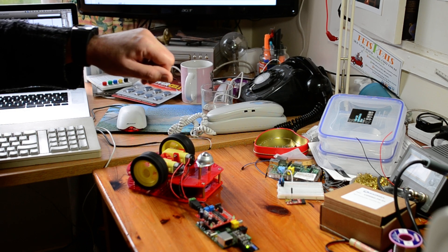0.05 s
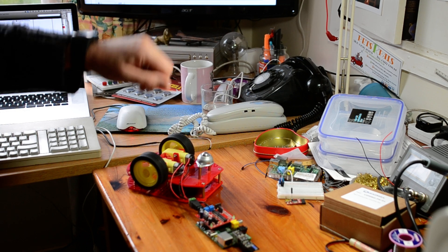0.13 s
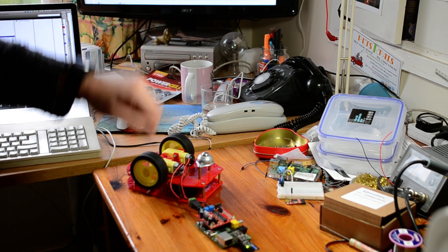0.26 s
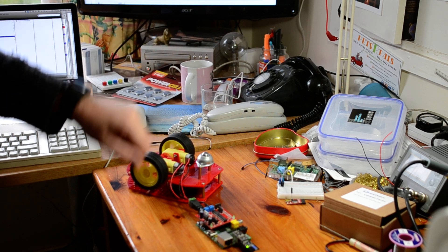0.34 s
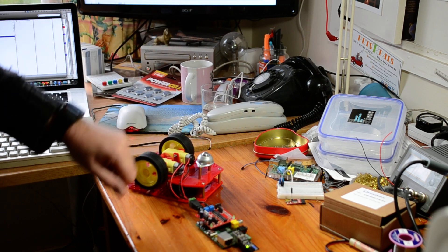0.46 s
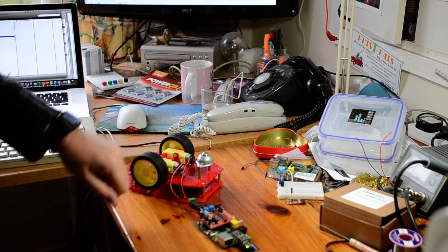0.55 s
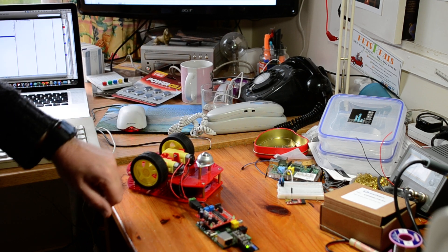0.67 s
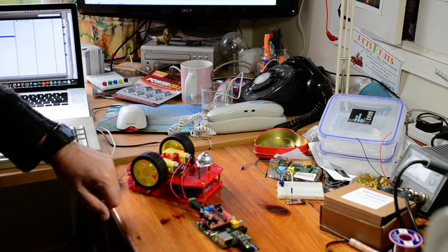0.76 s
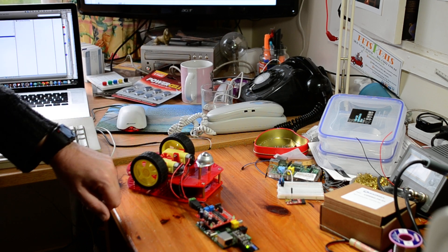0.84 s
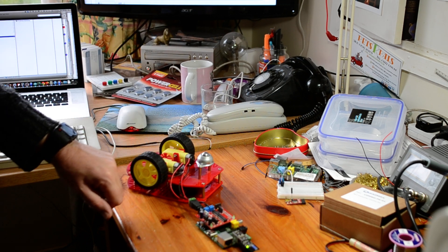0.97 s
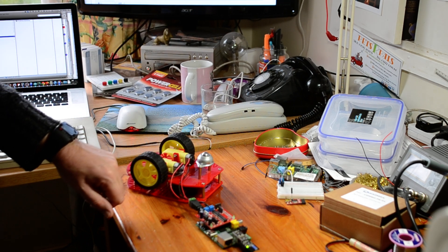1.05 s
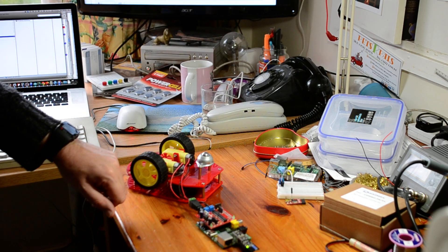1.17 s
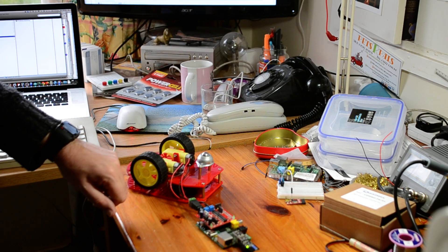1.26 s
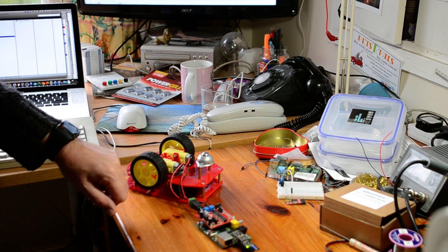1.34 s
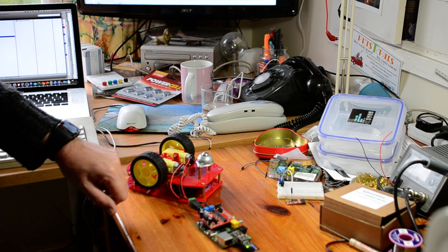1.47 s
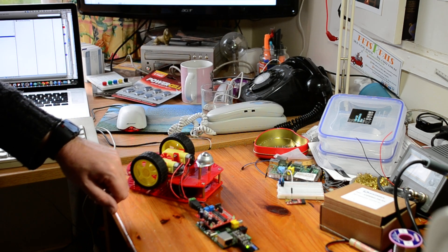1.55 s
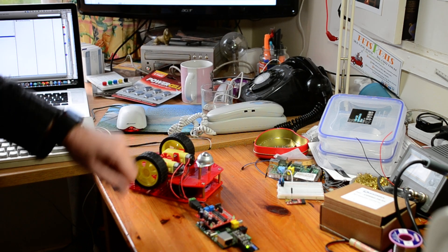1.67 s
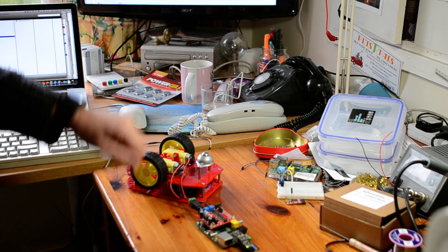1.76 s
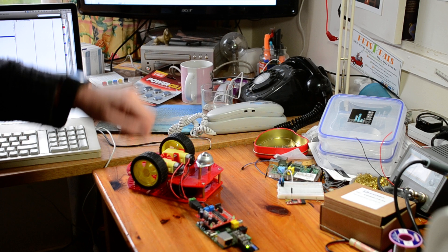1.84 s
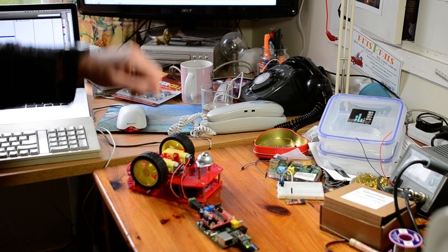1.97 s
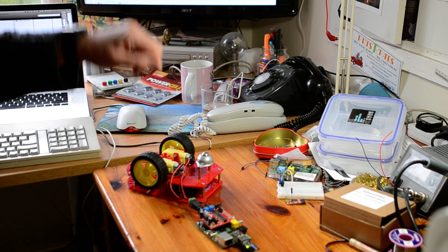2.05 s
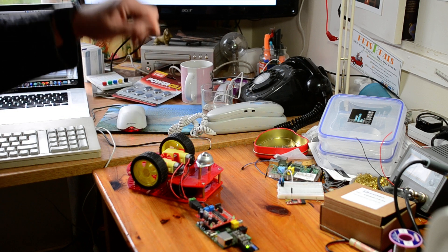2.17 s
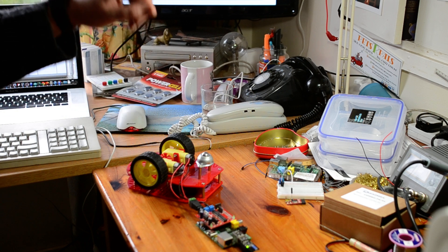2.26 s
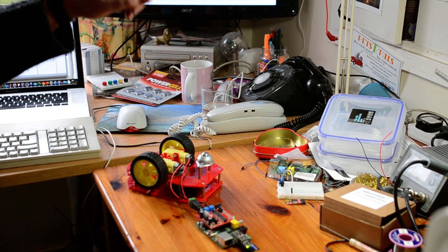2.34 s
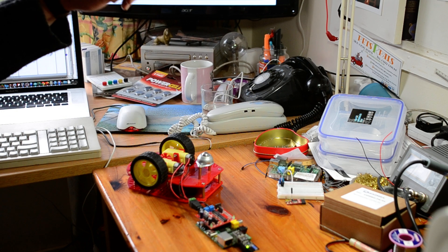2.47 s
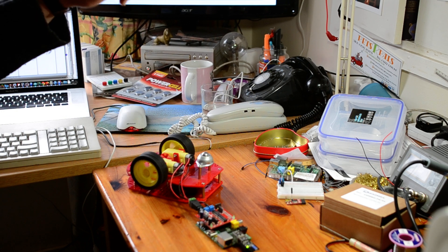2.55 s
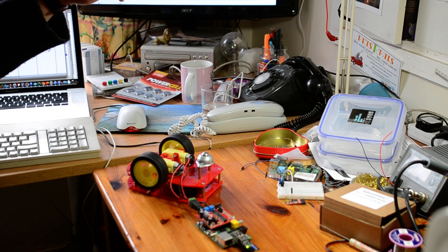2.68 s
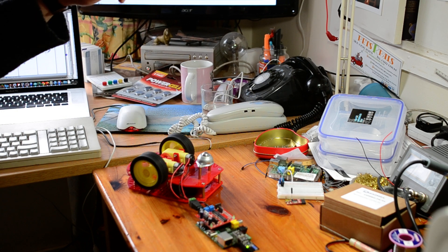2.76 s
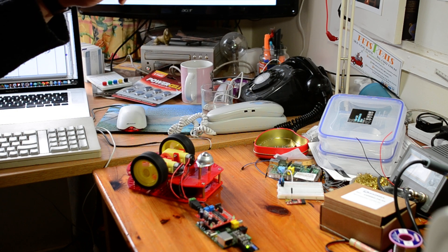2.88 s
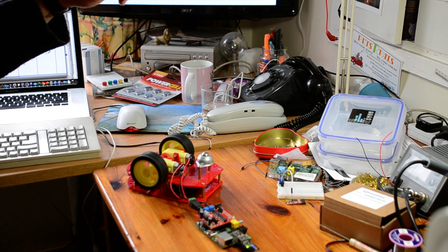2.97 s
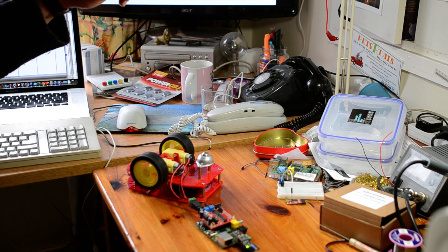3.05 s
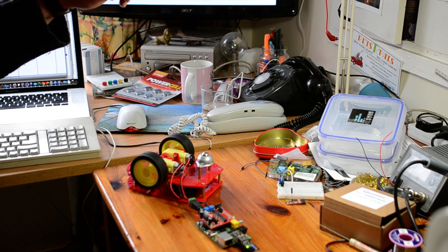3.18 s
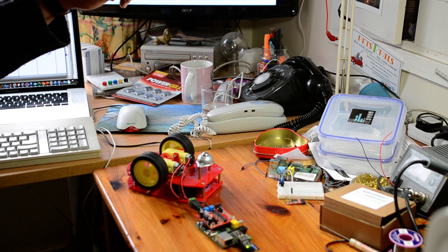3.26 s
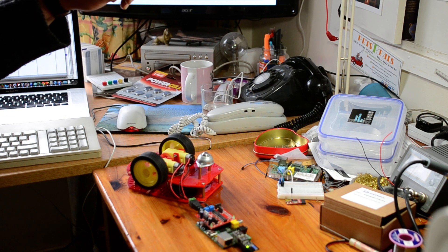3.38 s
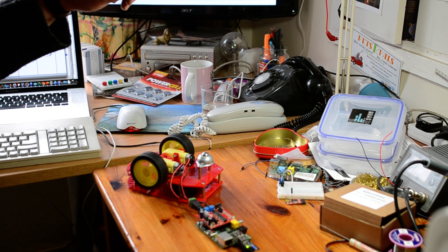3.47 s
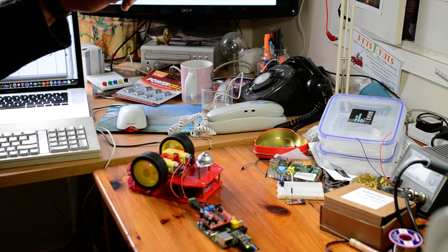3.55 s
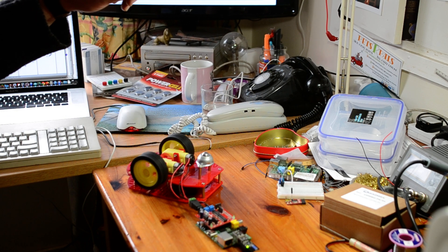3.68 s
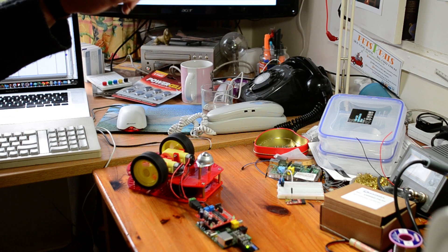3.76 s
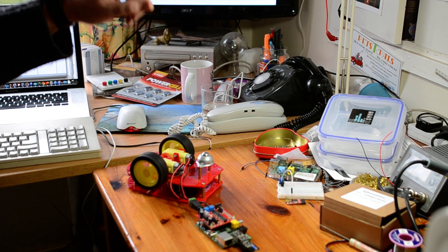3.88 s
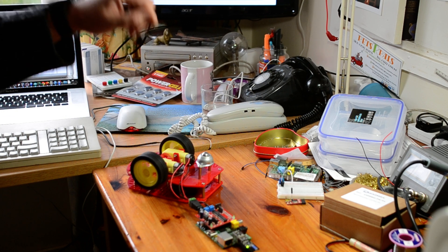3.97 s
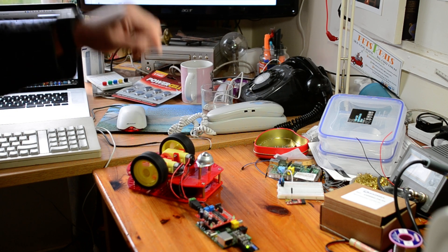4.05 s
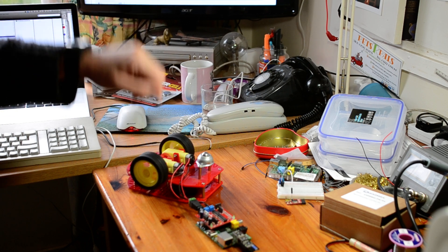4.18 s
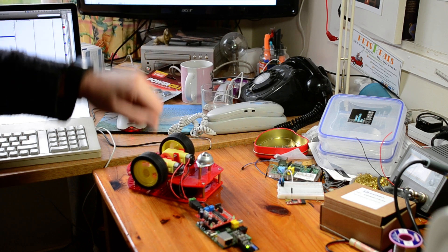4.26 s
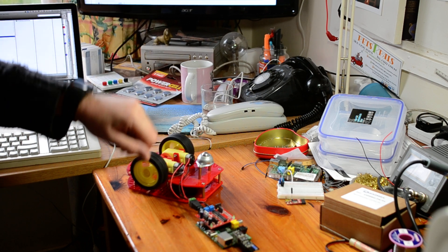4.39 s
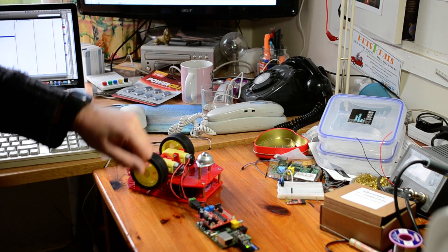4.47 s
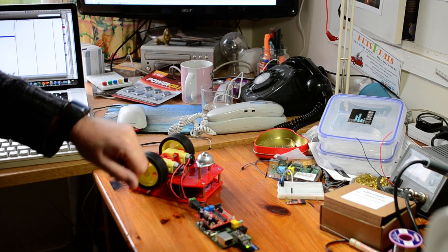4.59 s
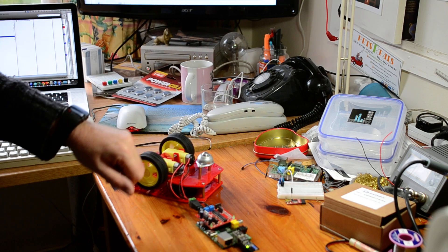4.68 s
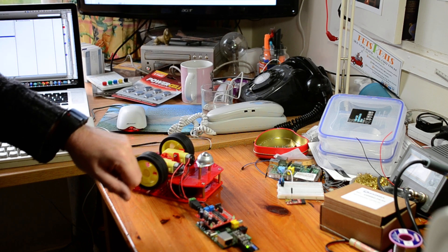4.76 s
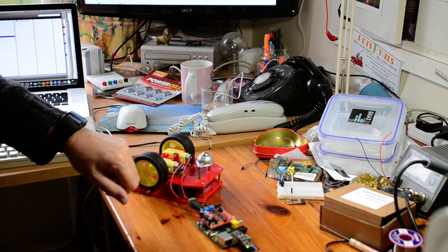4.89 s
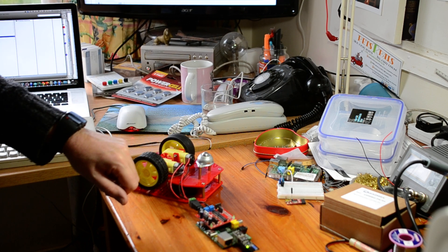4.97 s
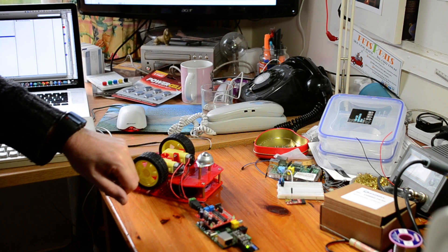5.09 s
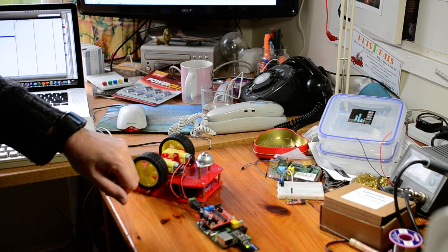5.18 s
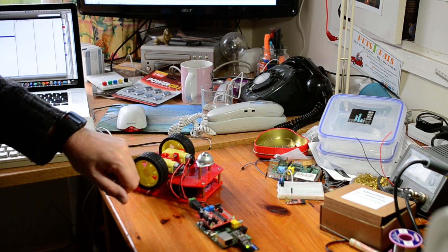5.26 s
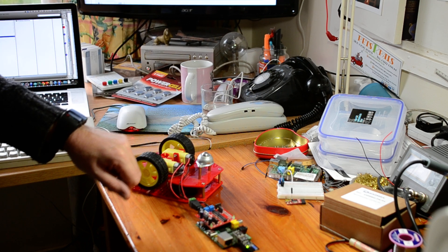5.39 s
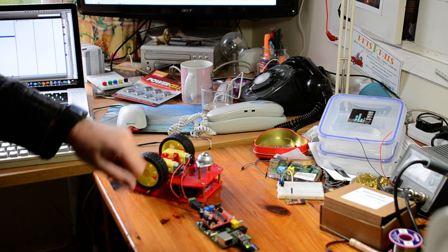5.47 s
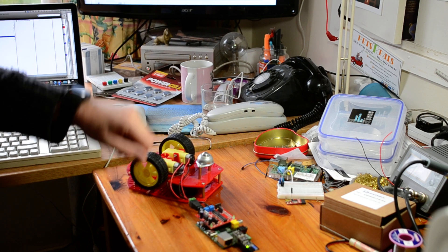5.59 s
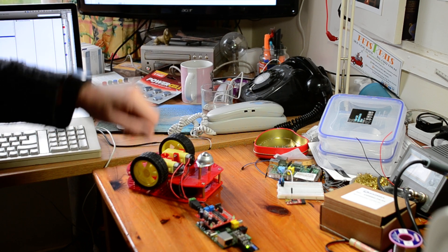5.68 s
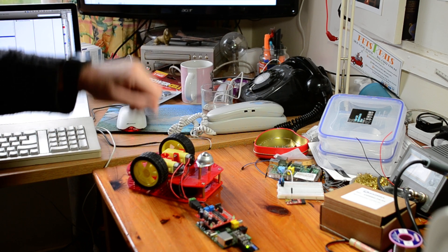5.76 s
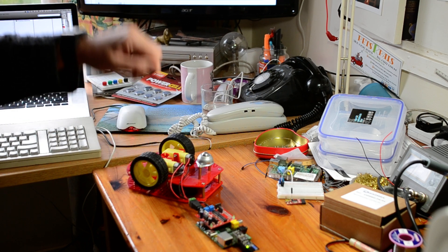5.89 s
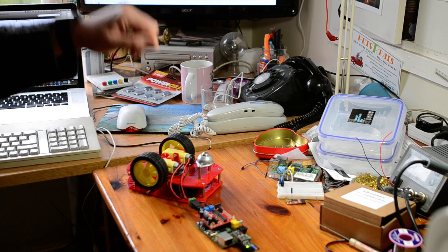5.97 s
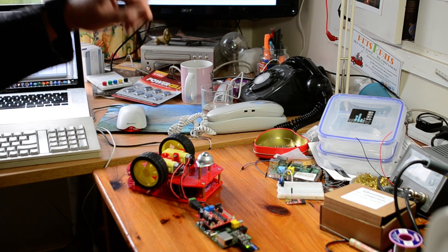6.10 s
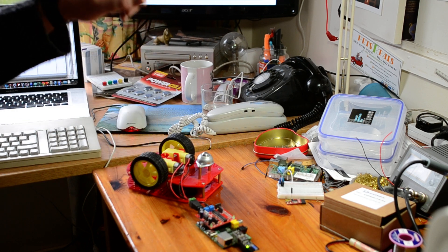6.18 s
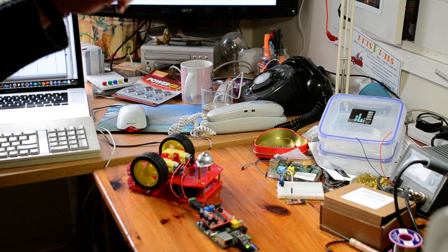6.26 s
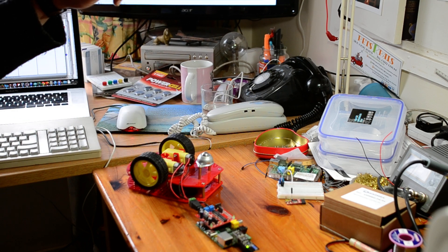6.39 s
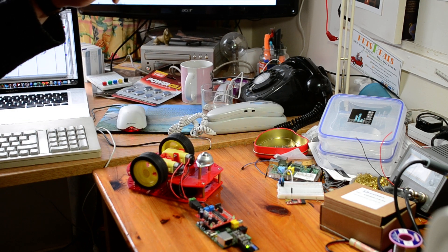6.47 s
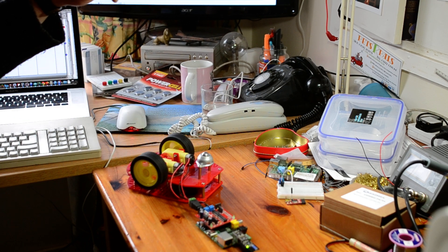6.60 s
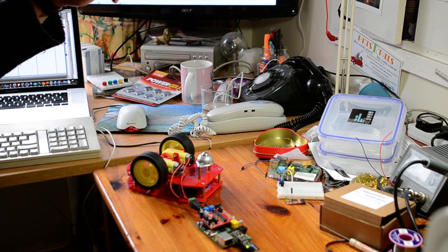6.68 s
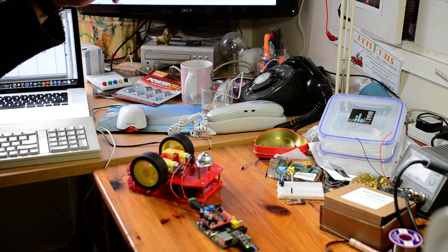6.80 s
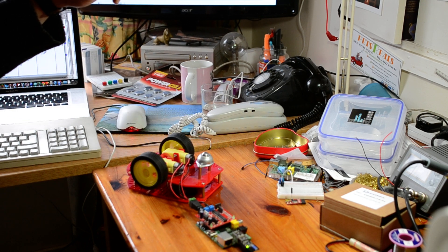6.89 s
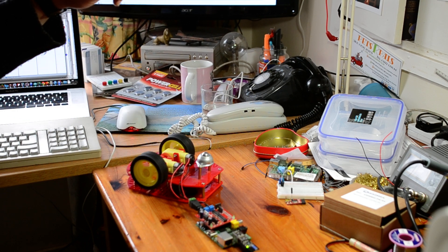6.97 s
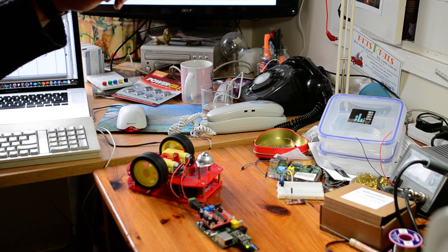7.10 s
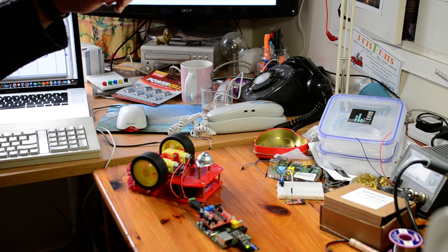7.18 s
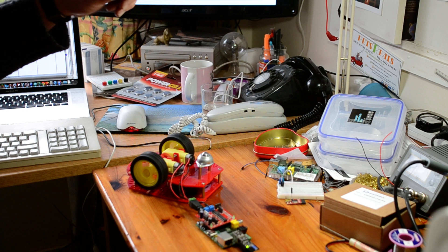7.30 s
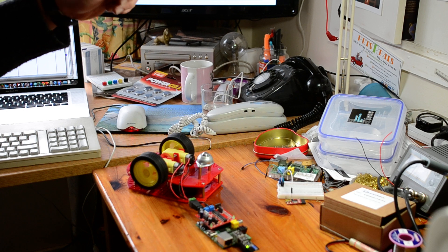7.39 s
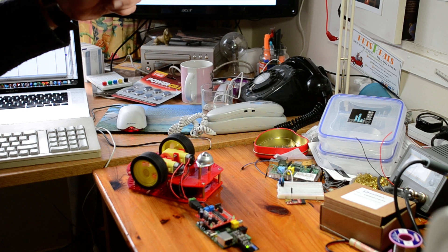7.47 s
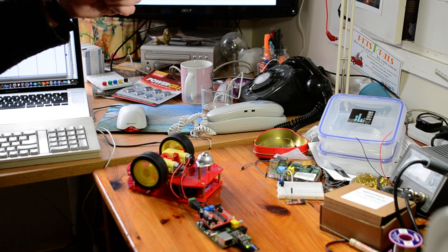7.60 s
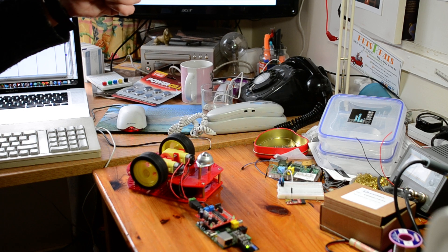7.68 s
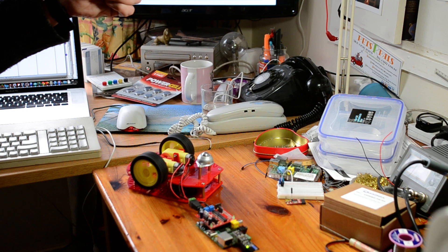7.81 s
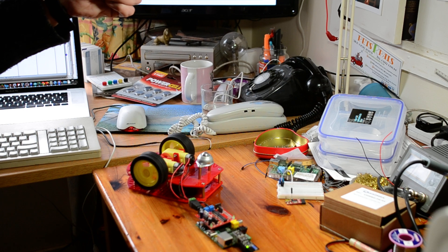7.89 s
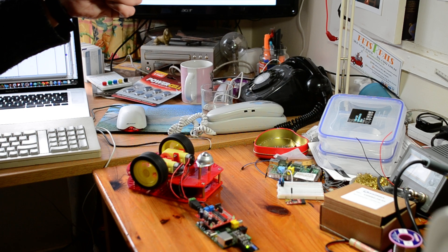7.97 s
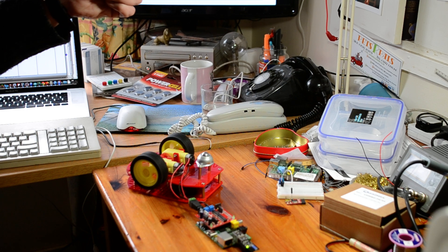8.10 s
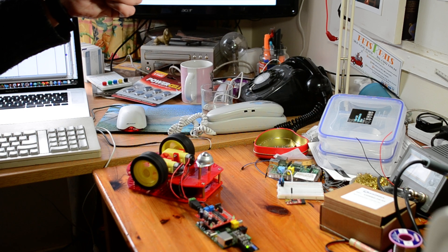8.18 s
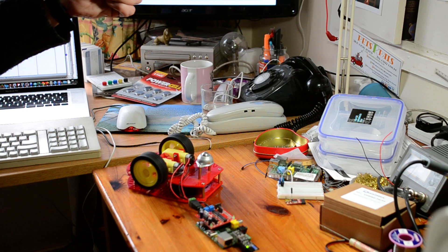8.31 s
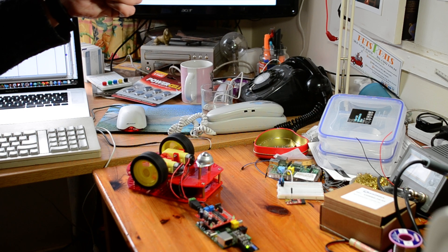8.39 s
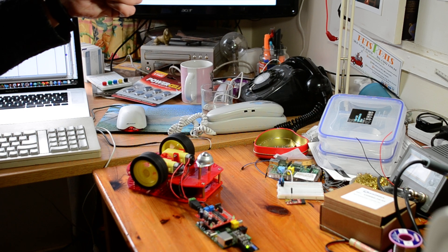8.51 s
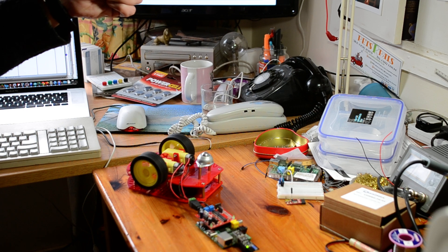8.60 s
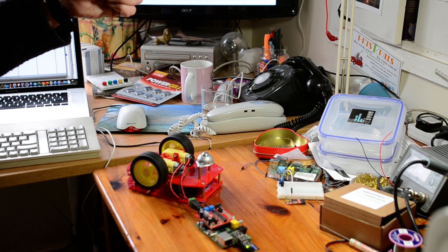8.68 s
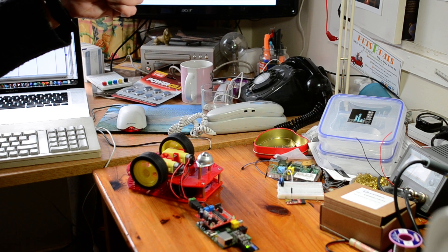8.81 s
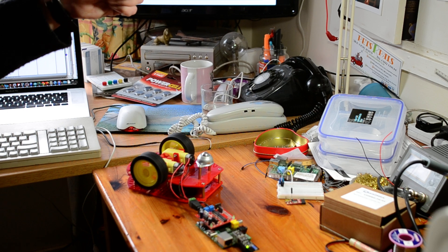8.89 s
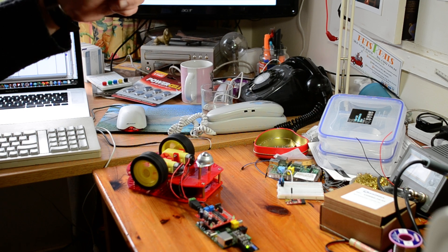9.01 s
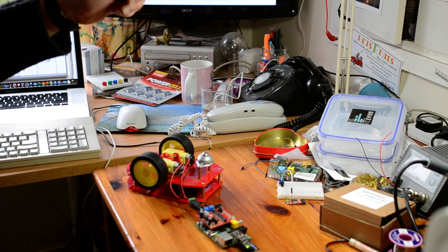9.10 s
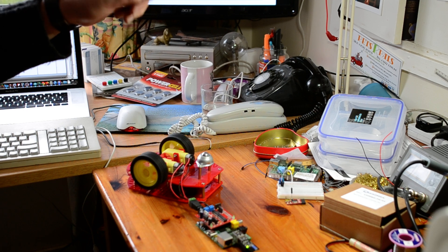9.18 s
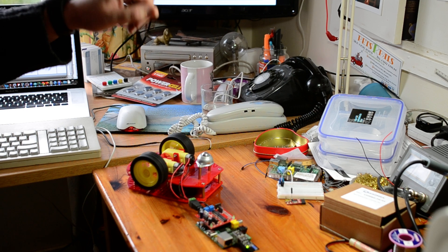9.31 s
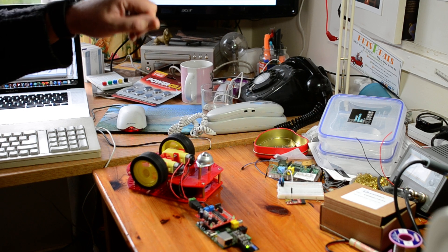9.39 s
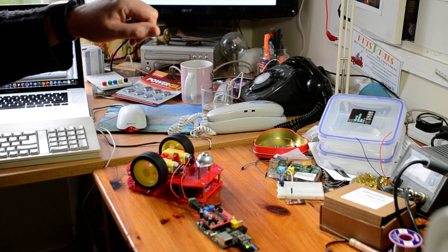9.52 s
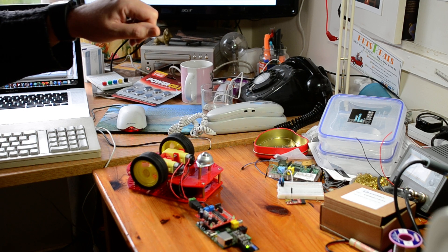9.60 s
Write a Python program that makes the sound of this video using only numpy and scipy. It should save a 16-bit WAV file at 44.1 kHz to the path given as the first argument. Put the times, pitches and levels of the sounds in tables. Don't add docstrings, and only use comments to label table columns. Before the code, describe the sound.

Two tiny electric gearmotors whine and rattle on a wooden bench, winding down to faint room hiss, then spinning up again in separate runs.

```python
import sys
import numpy as np
from scipy import signal
from scipy.fft import rfft, irfft
from scipy.io import wavfile
from scipy.ndimage import uniform_filter1d

SR = 44100
rng = np.random.default_rng(int(sys.argv[2]) if len(sys.argv) > 2 else 0)


def unload_wav(signal):
    wavfile.write(
        sys.argv[1],
        SR,
        np.round(np.clip(np.atleast_2d(signal).T, -1, 1) * 32767).astype(np.int16),
    )


def attenuation_scalar(level_db):
    decades = np.asarray(level_db, float) / 20
    return 10 ** decades


N = 425548
TIME = np.arange(N) / SR
FREQ = np.arange(N // 2 + 1) * SR / N


def unit(x):
    return x / np.sqrt(np.mean(x ** 2))


def curve(runs):
    seconds, *columns = np.transpose(sum(runs, []))
    return [np.interp(TIME, seconds, column) for column in columns]


def colour(spectrum, hz):
    points = np.array(spectrum)
    return attenuation_scalar(np.interp(np.log(hz + 1), np.log(points[:, 0]), points[:, 1]))


def walk(rate):
    hold = int(SR / rate)
    steps = np.repeat(rng.standard_normal(N // hold + 1), hold)
    slewed = uniform_filter1d(uniform_filter1d(steps, hold), hold)
    return 1.3 * slewed[:N]


def room():
    # frequency in Hz, density in dB per Hz
    noise_spectrum = [(12, -48), (20, -18.5), (43, -33), (71, -3.5), (139, -10.5), (167, -3.5), (390, -2.5),
                      (422, 0), (596, -2), (819, -1), (1100, -2.5), (1630, -6.5), (5680, -18.5),
                      (9910, -29), (11300, -34.5), (14700, -69.5), (22000, -120)]
    hiss = irfft(rfft(rng.standard_normal(N)) * colour(noise_spectrum, FREQ), N)
    return unit(hiss) * attenuation_scalar(-67 + .4 * walk(3))


def reflections(x):
    t = TIME[:SR // 2]
    decay = np.exp(-np.log(1000) * t / .3)
    tail = rng.standard_normal(len(t)) * decay * (t > .003)
    tail = tail / np.sqrt(np.sum(tail ** 2))
    return signal.fftconvolve(x, tail)[:N] * attenuation_scalar(-7.5)


def resonance_power(modes, hz, level_db):
    return sum(attenuation_scalar(level_db + db) ** 2 / (1 + (2 * (hz - centre) / width) ** 2)
               for centre, width, db in modes)


def body(hz):
    # frequency in Hz, level in dB per Hz
    shell = [(59, -78), (100, -43), (167, -14.5), (362, -18.5), (424, -2), (548, -10.5), (605, 2),
             (655, -11.5), (1100, -6), (1600, -4), (2420, -1), (4640, -2), (6250, -12), (9280, 3),
             (11300, -27.5), (14700, -54.5), (22000, -120)]
    # frequency in Hz, width in Hz, level in dB
    chassis = [(436, 36, -2.5), (608, 27, 1), (1450, 43, -5)]
    # frequency in Hz, width in Hz, level in dB
    gearbox = [(1860, 100, -3.5), (2080, 71, 2.5), (2470, 38, 5), (3030, 89, 2.5), (3340, 25, 4),
               (3930, 54, -11.5), (4140, 77, -1), (4480, 130, 0.5), (5560, 130, -4.5), (6340, 32, -3.5),
               (7120, 400, -5), (7680, 110, -24), (8130, 28, -23.5), (9030, 600, -1.5), (9290, 39, -5),
               (9510, 34, 8.5), (9910, 81, 2.5)]
    broad = colour(shell, hz) * attenuation_scalar(0.5)
    return np.sqrt(broad ** 2 + resonance_power(chassis, hz, -7.5) + resonance_power(gearbox, hz, 0.5))


def hum(turns, hz, drive_db, orders, full_hz):
    grid = np.arange(0, 3000.)
    gain = uniform_filter1d(body(grid), size=25)
    tones = 0
    for order, db in orders:
        gain_now = np.interp(order * hz, grid, gain)
        gain_at_full = np.interp(order * full_hz, grid, gain)
        swell = (gain_now / gain_at_full) ** .6
        phase = 2 * np.pi * (order * turns + .12 * walk(25))
        tones = tones + attenuation_scalar(db + 1.5 + 2.5 * walk(9)) * swell * np.sin(phase)
    return tones * attenuation_scalar(drive_db)


def ticks(turns, hz, full_hz):
    tooth = np.floor(8 * turns)
    hit = np.diff(tooth, prepend=tooth[0]) > 0
    knocks = hit * rng.standard_normal(N) * attenuation_scalar(2.5 * rng.exponential(size=N))
    scrape = rng.standard_normal(N) * (1 + .3 * np.cos(2 * np.pi * turns))
    return attenuation_scalar(-6.5) * unit(knocks) * np.sqrt(full_hz / hz) ** .5 + scrape


def gear_rattle(shake):
    # chassis below, axle buzz 5-8 kHz, tooth fizz above
    rattle_levels = [
        [(0.0, -37.5, -17, -8, -9), (0.016, -44.5, -9, 2.5, 4), (0.032, -40.5, -11.5, -5.5, -4.5),
         (0.37, -39, -14.5, -3, -3), (0.65, -48, -7, -7.5, -13), (0.754, -55, -4, -8.5, -18),
         (0.814, -64, -17, -17, -18), (0.816, -62, -3, -14, -21), (0.888, -78, 4, -8, -16),
         (0.9, -82, 2, -6, -23)],
        [(2.5, -77, -7, -18, -28), (2.51, -82, 6, -5, -8), (2.52, -55, -11, -12, -15),
         (2.53, -56, -10, -11, -21), (2.55, -50.5, -5, -9, -7), (2.58, -44, -11, -10, -11),
         (2.72, -40.5, -17.5, -4.5, -3.5), (2.84, -39.5, -11, -2.5, -4.5), (3.01, -39, -14, -3, -5),
         (4.06, -40, -14, -1.5, -3.5), (4.22, -38.5, -16, -4.5, -6), (4.23, -41, -13.5, 0, -3.5),
         (4.54, -40.5, -12, -3.5, -4.5), (4.63, -40.5, -11.5, -3.5, -4.5), (5.01, -57.5, -6, -10.5, -17.5),
         (5.09, -69, -1, -7, -14), (5.09, -64, -12, -17, -17.5), (5.14, -76, 4, -18, -20),
         (5.2, -82, 4, -12, -19)],
        [(6.4, -82, 3, -11, -18), (6.46, -48, -5.5, -9, -5.5), (6.53, -43.5, -16, -9, -7),
         (6.69, -39.5, -16, -2, -5), (6.75, -41, -8, -5, -3), (6.79, -36.5, -17, -6, -6.5),
         (6.9, -40, -10.5, -2.5, -3.5), (7.79, -38.5, -16, -2.5, -5), (7.81, -42.5, -7, -2, -5),
         (7.86, -38, -16, -3.5, -4), (8.22, -40.5, -14, -3.5, -3.5), (8.3, -38, -17, -10.5, -4.5),
         (8.34, -41.5, -11, -4.5, 0), (8.43, -41.5, -15.5, -4, -5), (8.49, -41, -15, -6, -6.5),
         (8.51, -40.5, -15, -4, -4), (8.53, -44, -9, -9, -3), (8.57, -40, -14, -7, -4),
         (9.16, -41, -14.5, -7, -3.5), (9.53, -41, -12, -4, -3.5), (9.65, -40.5, -14, -2.5, -3)],
    ]
    borders = (1500, 5000, 8000)
    wheel_load_db = .6 * walk(5) + .6 * walk(20)
    rung = rfft(shake * attenuation_scalar(wheel_load_db)) * body(FREQ)
    below = [0] + [1 / (1 + (FREQ / border) ** 12) for border in borders] + [1]
    bands = []
    for lower, upper in zip(below, below[1:]):
        band = unit(irfft(rung * (upper - lower), N))
        bands.append(band * attenuation_scalar(.5 * walk(11)))
    low, mid, buzz, fizz = bands
    db, low_db, buzz_db, fizz_db = curve(rattle_levels)
    mix = mid + attenuation_scalar(low_db - 2.5) * low + attenuation_scalar(buzz_db) * buzz + attenuation_scalar(fizz_db) * fizz
    return attenuation_scalar(db - 2.0) * mix


def motors():
    # time in seconds, shaft speed in turns per second, drive in dB
    fast = [
        [(0, 177, 1), (.25, 176, -6.5), (.4, 186, -1), (.5, 165, -13), (.65, 105, -18), (.86, 15, -33)],
        [(2.52, 15, -20), (2.6, 95, -12), (2.7, 150, -7)] + [(2.8, 176.9, -10), (2.934, 194.2, -9),
         (3.094, 200.8, 2.5), (3.522, 204.2, 7.5), (3.532, 206.3, 2.5), (3.736, 203.0, 5), (3.772, 207.0, 1.5),
         (4.394, 204.3, 4.5), (4.424, 199.5, 6), (4.454, 205.0, 9.5), (4.6, 204.5, 4)] + [(4.68, 200, -4),
         (4.8, 150, -8), (4.95, 85, -19), (5.14, 15, -36)],
        [(6.42, 15, -22), (6.5, 95, -11), (6.6, 150, -11)] + [(6.72, 180.1, -1), (6.78, 188.2, -5),
         (6.91, 200.3, 0), (7.36, 206.0, 5), (7.93, 205.8, 3), (7.98, 200.0, -1), (8.06, 202.2, -4),
         (8.09, 187.0, 2), (8.12, 176.1, -5), (8.29, 177.3, 2.5), (8.37, 174.3, -3), (8.74, 177.3, -5.5),
         (8.95, 174.0, -0.5), (8.99, 176.0, -3.5), (9.65, 176.7, -2)],
    ]
    # time in seconds, shaft speed in turns per second, drive in dB
    slow = [
        [(0, 174, 0), (.3, 173, 2), (.42, 160, -3), (.5, 143, 2), (.65, 90, -14), (.86, 15, -30)],
        [(2.52, 15, -20), (2.6, 80, -7)] + [(2.7, 133.3, -5), (2.82, 151.1, 7), (2.922, 157.8, -5),
         (2.99, 147.5, 4), (3.086, 165.1, 1.5), (3.132, 164.9, 9), (3.298, 155.6, -0.5), (3.986, 159.6, -1),
         (4.048, 165.4, 6.5), (4.112, 157.6, -5), (4.6, 158.2, -10.5)] + [(4.66, 160, 5), (4.75, 138, -7),
         (4.9, 90, -7), (5.14, 15, -30)],
        [(6.42, 15, -17), (6.52, 85, -8)] + [(6.62, 138.5, 6), (6.78, 154.3, -2), (6.89, 151.8, -1),
         (6.98, 159.3, 0), (7.06, 154.5, 3), (7.41, 158.8, -2), (7.74, 158.6, -5), (7.78, 167.5, 3),
         (7.83, 158.6, -8), (7.88, 158.7, -3), (7.94, 177.5, 4.5), (8.1, 185.6, 6), (8.14, 175.7, -6),
         (9.07, 176.1, -1.5), (9.09, 178.0, -1), (9.65, 175.1, -6)],
    ]
    # multiple of the shaft turn, level in dB
    fast_orders = [(1, -70), (2, -81.5), (3, -63.5), (4, -73), (5, -73), (7, -62.5), (8, -52.5), (9, -65),
                   (10, -65.5), (11, -65.5), (12, -62)]
    # multiple of the shaft turn, level in dB
    slow_orders = [(1, -73), (3, -68.5), (4, -67), (5, -74.5), (7, -68), (8, -69), (9, -83.5)]
    tones = shake = 0
    for runs, orders, full_hz in ((fast, fast_orders, 206), (slow, slow_orders, 170.5)):
        hz, drive_db = curve(runs)
        turns = np.cumsum(hz * (1 + .0015 * walk(12))) / SR
        tones = tones + hum(turns, hz, drive_db, orders, full_hz)
        shake = shake + ticks(turns, hz, full_hz)
    running = sum((TIME > run[0][0]) & (TIME < run[-1][0]) for run in fast)
    return uniform_filter1d(running * 1., size=400) * (gear_rattle(shake) + tones)


def scene():
    robot = motors()
    return np.tile(robot + reflections(robot) + room(), (2, 1))


def top_cut(x):
    return signal.sosfilt(signal.butter(12, 11460, fs=SR, output="sos"), x)


def record(dry):
    low_pass = signal.ellip(8, .2, 45, 11300, fs=SR, output="sos")
    return top_cut(signal.sosfilt(low_pass, dry))


dry = scene()
out = record(dry)
unload_wav(out)
```